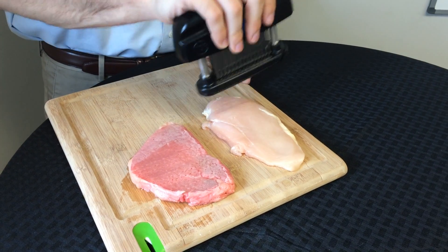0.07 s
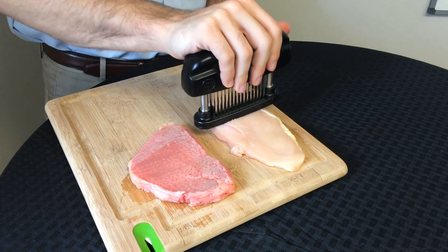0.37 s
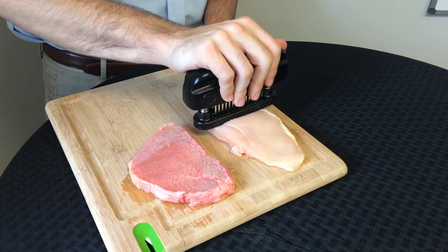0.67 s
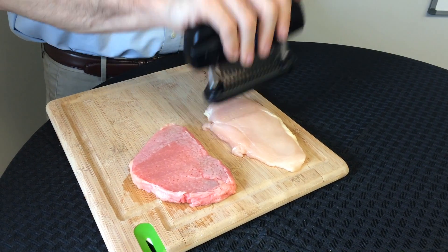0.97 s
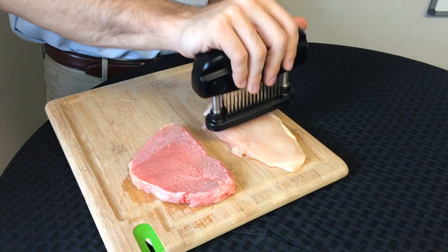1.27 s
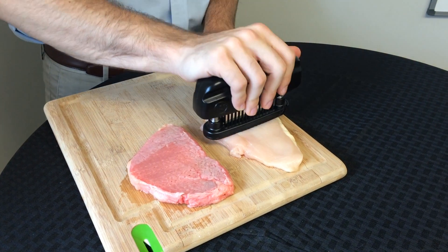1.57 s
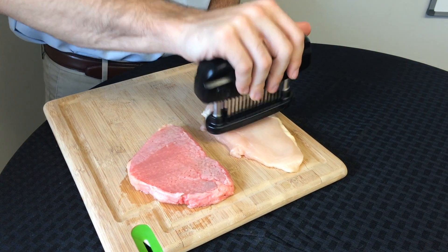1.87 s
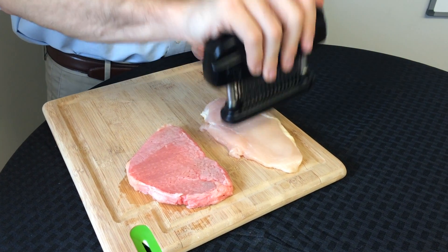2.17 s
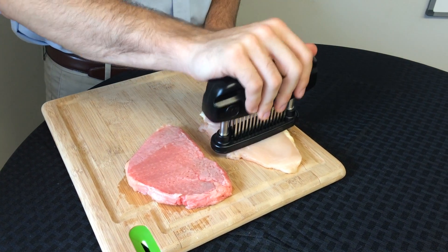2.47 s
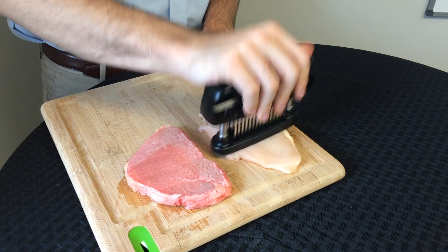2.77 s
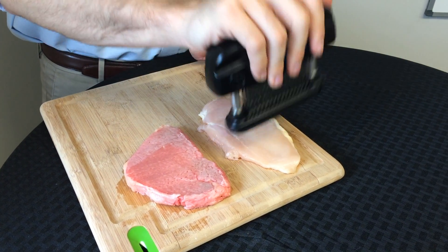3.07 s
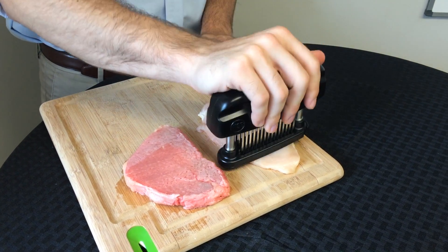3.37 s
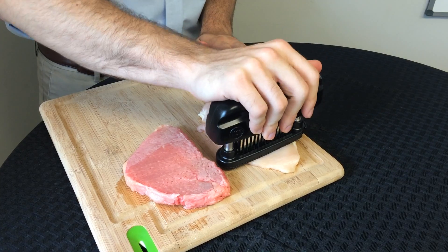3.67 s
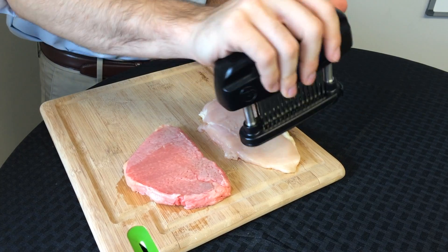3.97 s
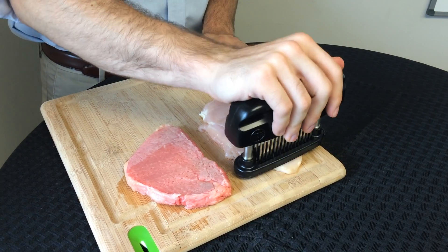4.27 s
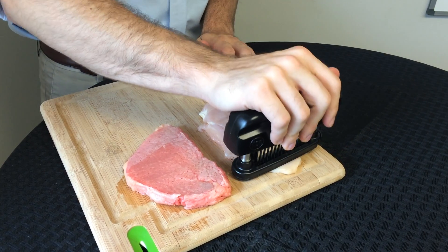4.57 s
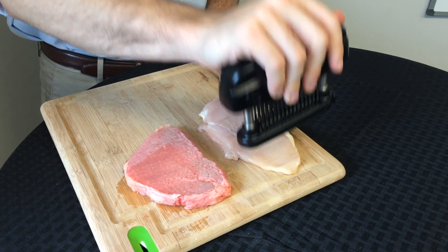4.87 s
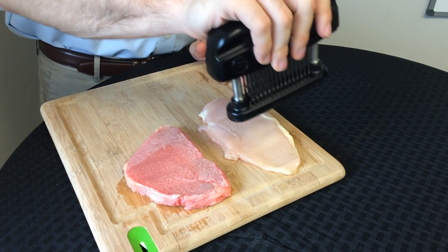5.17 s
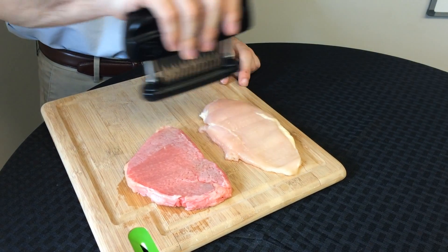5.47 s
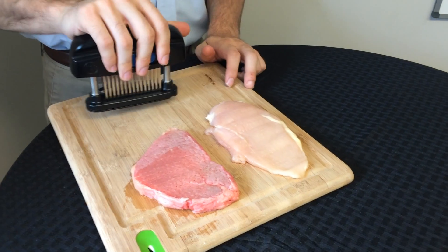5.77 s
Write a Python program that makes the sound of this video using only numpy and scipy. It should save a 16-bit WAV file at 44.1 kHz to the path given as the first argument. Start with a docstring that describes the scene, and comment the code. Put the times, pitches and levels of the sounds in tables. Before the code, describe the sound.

Sharp plastic snaps repeat five times in a steady rhythm as a meat tenderizer works raw chicken, close to the microphone. Before each snap come quieter sounds: the guard taps the meat, steel blades scrape in their slots and knock dully on a wooden board. After each snap the blades rattle briefly and the springs ring faintly. A low appliance hum fills the quiet kitchen.

```python
"""Blade tenderizer on a wooden board

A spring-loaded tenderizer is pressed five times into raw chicken, in a kitchen with a low hum.
Impact makes its plastic guard click; friction makes the blades scrape and squeak in their slots before
they knock on the board. On release the meat squelches and the guard slides back and snaps against its
stop. The snap sets blades and springs in free vibration: a short shimmer and a long, singing tone."""
import sys
import numpy as np
from scipy import signal
from scipy.fft import rfft, irfft, next_fast_len
from scipy.io import wavfile
from scipy.ndimage import map_coordinates

SR = 44100
rng = np.random.default_rng(int(sys.argv[2]) if len(sys.argv) > 2 else 0)


def put_to_file(sound):
    """Save the sound as 16-bit audio at rate SR, in the file named by the first command-line argument."""
    columns = np.atleast_2d(sound).T  # one column per channel
    safe = np.clip(columns, -1, 1)
    whole_steps = np.round(safe * 32767)
    wavfile.write(sys.argv[1], SR, whole_steps.astype(np.int16))


N = 256471

# Upstrokes; the first ends before time zero. Each row: hand eases off and guard hits its stop in seconds,
# snap level and body in dB, lead of the first corner in seconds, blade ring and squelch levels in dB.
UPSTROKES = [(-.12, -0.044, -18.5, -8.5, .001, -33, -56), (0.814, 0.8983, -14.5, -4, .0018, -29, -59.5),
             (1.836, 1.9125, -14, -5, 0.0014, -28, -45.5), (2.813, 2.882, -12.5, -4, 0.0025, -29, -50),
             (3.7808, 3.84, -15.5, -7.5, .0012, -30, -44), (4.746, 4.7971, -11.5, 2.5, 0.00089, -34.5, -47)]
# Downstrokes. Each row: slide starts and tips reach the board in seconds, slack click and scrape levels
# in dB, sag of the scrape as the meat slows the blades in dB per second, squeak and knock levels in dB.
DOWNSTROKES = [(0.551, 0.6139, -60, -40, 10, -34, -32.5), (1.596, 1.6614, -48.5, -38.5, 80, -37.5, -26.5),
               (2.595, 2.639, -49, -38.5, 38, -44, -33.5),
               (3.5514, 3.603, -44.5, -38.5, 219.5, -38.5, -32.5),
               (4.5195, 4.5373, -48, -36, 260, -37, -30.5)]
# The guard taps the meat or shifts on its posts.
# Each row: start in seconds, level in dB, body in dB, brightness (a brief, harsh high hiss) in dB.
GUARD_TAPS = [(0.4057, -34.5, -7, -16), (.423, -43.5, 3.5, -16), (1.4783, -30, 0, -11),
              (2.4312, -32, -9, -11), (2.4431, -39, -0.5, -8), (3.4204, -25, -8, -4),
              (4.3636, -31, -11, -13.5), (5.3287, -63, 2, -20)]
# A blade catches in its slot. Each row: start in seconds, level in dB.
BLADE_CATCHES = [(0.5552, -33), (0.5861, -32), (1.6253, -36.5), (2.6291, -38), (3.597, -38.5), (4.535, -35)]

# Modes of the plastic guard and housing. Each row: frequency in Hz, bandwidth in Hz, peak level in dB.
HOUSING_MODES = [(394, 28, -9), (612, 60, -13.5), (815, 99, -4.5), (956, 32, -6.5), (1178, 100, 0.5),
                 (1640, 38, -4), (2030, 160, -10), (2565, 97, -4.5), (3326, 100, 2), (3630, 450, 3),
                 (4135, 130, 1), (5550, 220, -5), (6480, 420, -4.5), (7350, 220, 0), (8445, 540, -2),
                 (9050, 310, -4), (11110, 400, -11)]
# Modes of the coil springs and the board. Each row: frequency in Hz, level in dB, T60 in seconds.
SPRING_MODES = [(795, -3, 8.5), (822, -5.5, 2.6), (835, 2, 4.6), (1707, -18, 4), (1760, -17, 6),
                (4942, -16, 1.7), (4877, -15.5, 1.3)]
BOARD_MODES = [(390, -12, .06), (450, -17, .04), (660, -7, .05), (790, -7, .035), (1020, -8, .03),
               (1300, -11, .025)]
# Squeaking blade modes and appliance hum. Each row: frequency in Hz, level in dB.
SQUEAK_TONES = [(5740, 1.5), (4140, -1.5)]
HUM_TONES = [(52.1, -47), (112.6, -46.5), (225, -60)]

# Noise spectra. Each row: frequency in Hz, relative spectral density in dB.
CRACK_SPECTRUM = [(180, -54.5), (300, -23.5), (1200, -8), (1490, -8), (2880, -9), (3690, -4), (4880, -6.5),
                  (5480, -8), (9140, -10.5), (12900, -17.5), (15500, -31)]
BRIGHT_SPECTRUM = [(4000, -30), (8000, -11), (10800, 1), (12500, -1), (15500, -23.5)]
SHIMMER_SPECTRUM = [(300, -20), (600, -2.5), (850, -5.5), (1190, 4.5), (1450, -2.5), (1700, -2.5),
                    (2050, -12.5), (2480, -2), (3250, -2.5), (3750, -5.5), (5500, -9.5), (8500, -15.5),
                    (12000, -15.5), (15500, -26.5)]
DOWN_SCRAPE_SPECTRUM = [(240, -41), (400, -19), (873, 5.5), (1300, -8.5), (1790, -4), (2880, -7.5),
                        (4090, -2.5), (4920, -8.5), (5730, -9.5), (6480, -8.5), (8930, -1), (11900, -5),
                        (15500, -22)]
UP_SCRAPE_SPECTRUM = [(240, -43.5), (400, -16.5), (886, -7), (2120, -10.5), (2400, -3.5), (2920, -15),
                      (3570, -3), (6280, -13.5), (8030, -1.5), (11900, -5.5), (15500, -25.5)]
SQUASH_SPECTRUM = [(250, -22.5), (400, -4.5), (520, -11.5), (700, 0.5), (1200, -5.5), (2000, -15),
                   (8000, -38.5)]
RUMBLE_SPECTRUM = [(22, -21), (40, -4), (70, 1), (100, -7), (135, -1), (148, -6.5), (163, 2.5),
                   (205, -10.5), (245, -14.5), (283, -9.5), (315, -29), (450, -31), (700, -61.5)]
HISS_SPECTRUM = [(150, -29.5), (300, -14.5), (450, -9), (880, -17.5), (1840, -22.5), (3700, -24),
                 (7300, -25.5), (11000, -29), (15500, -43)]
# Decay of the blades and the kitchen. Each row: frequency in Hz, T60 in seconds.
BLADE_T60 = [(500, .3), (1200, 0.16), (3200, 0.39), (8000, .44), (14000, 0.19)]
KITCHEN_T60 = [(200, .25), (1000, .25), (4000, .19), (14000, .16)]

SPRING_DB = -45  # relative to the snap
THUMP_DB, JOLT_DB = 4.5, -8  # table and housing, relative to the knock
SLACK_LEAD_S, UNSTICK_S, OVERRUN_S = .024, .018, .0079
TICKS_PER_S, TICK_DB, SETTLE_DB_PER_S = 12, -55, 80.5
PING_HZ, KNOCK_HZ, THUMP_HZ, SQUELCH_HZ, TOP_HZ = 3580, 890, 80, 820, 15700


def amp(db):
    """Decibels as an amplitude ratio."""
    return 10 ** (np.asarray(db) / 20)


def unit_rms(x):
    """x scaled to rms 1."""
    return x / np.sqrt(np.mean(x ** 2) + 1e-20)


def blow(x):
    """A transient scaled to the energy of 4 ms at rms 1."""
    return x / np.sqrt(np.sum(x ** 2) / (.004 * SR) + 1e-20)


def along(points, hz):
    """Interpolation of (Hz, value) points on a logarithmic frequency axis."""
    freqs, values = np.transpose(points)
    return np.interp(np.log(hz + 1), np.log(freqs + 1), values)


def clock(seconds):
    """Sample times of a span."""
    return np.arange(round(seconds * SR)) / SR


def fade(t, t60):
    """Exponential decay of 60 dB in t60 seconds; 1 while t is negative."""
    return amp(-60 * np.maximum(t, 0) / np.maximum(t60, 1e-4))


def rise(t, tau):
    """Exponential onset with a time constant of tau seconds."""
    return 1 - np.exp(-t / tau)


def scatter(hz, share):
    """A frequency with Gaussian relative scatter."""
    return hz * (1 + share * rng.standard_normal())


def tone(hz, t):
    """A sinusoid of random phase."""
    return np.sin(2 * np.pi * (hz * t + rng.random()))


def wobble(rate):
    """A smooth random curve with rate knots a second."""
    knots = rng.standard_normal(int(N * rate / SR) + 4)
    return map_coordinates(knots, [np.arange(N) * rate / SR])


def coloured(x, spectrum):
    """x filtered by a spectrum, at rms 1."""
    gain = amp(along(spectrum, np.fft.rfftfreq(len(x), 1 / SR)))
    return unit_rms(irfft(rfft(x) * gain, len(x)))


def noise(spectrum, size):
    """Coloured noise of rms 1."""
    return coloured(rng.standard_normal(next_fast_len(size)), spectrum)[:size]


def damped(x, decay):
    """Frequency-dependent damping: each band of x decays at its own rate."""
    hz, t, bands = signal.stft(x, SR, nperseg=256)
    return signal.istft(bands * fade(t, along(decay, hz)[:, None]), SR, nperseg=256)[1]


def add(track, start, x):
    """Superpose x on the track from start seconds."""
    i = round(start * SR)
    x = x[max(-i, 0):max(N - i, 0)]
    track[max(i, 0):][:len(x)] += x


def with_body(x, body_db):
    """A square blow moves the whole housing and favours its low modes: a shelf below 1500 Hz."""
    lows = signal.lfilter(*signal.butter(1, 1500, fs=SR), x)
    return x + (amp(body_db) - 1) * lows


def clack(body_db, crack_db=1, crack_t60=.024, contact_s=.0005):
    """Impact excites damped modes of the plastic, and a broadband crack while the parts grind together."""
    t = clock(.1)
    ring = sum(amp(db) * width * tone(scatter(hz, .0066), t) * np.exp(-np.pi * width * t)
               for hz, width, db in HOUSING_MODES)
    crack = noise(CRACK_SPECTRUM, len(t)) * fade(t - contact_s, crack_t60)
    hit = blow(ring * rise(t, .0005)) + amp(crack_db) * blow(crack)
    return with_body(blow(hit * rise(t, .00024)), body_db)


def guard_snaps():
    """The springs' restoring force drives the guard to its stop: one corner, the whole, then chatter."""
    out, t = np.zeros(N), clock(.1)
    for _, snap, db, body_db, lead, _, _ in UPSTROKES:
        add(out, snap - lead, amp(db - 10) * clack(body_db + 3, crack_db=0, crack_t60=.014))
        add(out, snap, amp(db) * clack(body_db, crack_db=-2, crack_t60=.014, contact_s=.001))
        chatter = noise(CRACK_SPECTRUM, len(t)) * fade(t, .062) * rise(t, .0013)
        add(out, snap, amp(db - 9.5) * with_body(chatter, body_db))
    return out


def guard_clicks():
    """Light impacts excite the guard as it taps, catches, takes up slack, is jolted and settles."""
    out, t = np.zeros(N), clock(.1)
    for start, db, body_db, bright_db in GUARD_TAPS:
        # A light tap leaves the guard free to ring on its steel posts.
        ping = tone(scatter(PING_HZ, .025), t) * fade(t, .027) * rise(t, .0005)
        tap = clack(body_db) + amp(bright_db) * bright_hiss() + amp(-8.5) * blow(ping)
        add(out, start, amp(db) * tap)
    for start, db in BLADE_CATCHES:
        add(out, start, amp(db) * (clack(body_db=-6) + amp(-2) * bright_hiss()))
    for start, bottom, slack_db, *_, knock_db in DOWNSTROKES:
        add(out, start - SLACK_LEAD_S, amp(slack_db) * clack(body_db=15))
        add(out, bottom, amp(knock_db + JOLT_DB) * clack(body_db=6))
        for held in np.cumsum(rng.exponential(1 / TICKS_PER_S, size=3)):
            add(out, bottom + held, amp(TICK_DB - SETTLE_DB_PER_S * held) * clack(body_db=4))
    return out


def bright_hiss():
    """High-frequency energy is heard as brightness: a brief, harsh hiss that sharpens a click."""
    t = clock(.1)
    return blow(noise(BRIGHT_SPECTRUM, len(t)) * fade(t, .025))


def friction(spectrum, slips_per_s=2500, smooth_db=-2):
    """Sliding friction of steel on plastic: many tiny random slips over a smooth hiss."""
    slips = (rng.random(N) < slips_per_s / SR) * rng.standard_normal(N)
    return coloured(unit_rms(slips) + amp(smooth_db) * rng.standard_normal(N), spectrum)


def blade_scrapes():
    """Friction noise follows sliding speed: it sags going down and swells as the guard springs back."""
    t = np.arange(N) / SR
    down, up = np.zeros(N), np.zeros(N)
    for start, bottom, _, db, sag, _, _ in DOWNSTROKES:
        onset = fade(start - t, .07)
        sag_db = sag * np.clip(t - start, 0, bottom - start)
        down += amp(db - sag_db) * onset * fade(t - bottom, .026)
    for ease, snap, *_ in UPSTROKES:
        start, end = ease + UNSTICK_S, snap + OVERRUN_S
        speed = np.sin(np.pi / 2 * np.clip((t - start) / (end - start), 0, 1))
        up += amp(-31) * speed ** 2.7 * fade(t - end, .024)
    rubbing = down * friction(DOWN_SCRAPE_SPECTRUM) + up * friction(UP_SCRAPE_SPECTRUM)
    grip = amp(.71 * wobble(rate=180))
    return grip * rubbing


def blade_squeaks():
    """Stick-slip drives two blade modes at an unsteady pitch as each downstroke starts."""
    out, t = np.zeros(N), clock(.06)
    swell = t / .004 * np.exp(1 - t / .004)
    for start, *_, db, _ in DOWNSTROKES:
        for hz, mode_db in SQUEAK_TONES:
            pitch = hz * (1 + .022 * wobble(rate=1000)[:len(t)])
            phase = 2 * np.pi * np.cumsum(pitch) / SR
            add(out, start, amp(db + mode_db) * swell * np.sin(phase))
    return out


def blade_shimmer():
    """High modal density: shaken by the snap, the thin steel blades ring as a band of decaying noise."""
    out, t = np.zeros(N), clock(.81)
    for _, snap, _, body_db, _, ring_db, _ in UPSTROKES:
        ring = damped(noise(SHIMMER_SPECTRUM, len(t)), BLADE_T60)[:len(t)]
        rattle = amp(1.7 * wobble(rate=110)[:len(t)])  # loose blades touch their neighbours
        add(out, snap, amp(ring_db) * with_body(ring, body_db) * rattle * rise(t, .0018))
    return out


def board_knocks():
    """The blade tips excite modes of the wood, heavily damped by the meat; the table thumps below."""
    out, t = np.zeros(N), clock(.2)
    onset = rise(t, .0008)
    thump = np.sin(2 * np.pi * THUMP_HZ * t) * fade(t, .07) * rise(t, .004)
    for _, bottom, *_, db in DOWNSTROKES:
        modes = sum(amp(mode_db) * tone(scatter(hz, .013), t) * fade(t, t60)
                    for hz, mode_db, t60 in BOARD_MODES)
        knock = tone(scatter(KNOCK_HZ, .034), t) * fade(t, .022)  # pitch varies from spot to spot
        wood = blow((knock + modes) * onset)
        squash = noise(SQUASH_SPECTRUM, len(t)) * fade(t, .27) * onset
        add(out, bottom, amp(db) * (wood + amp(-22) * squash + amp(THUMP_DB) * thump))
    return out


def meat_squelches():
    """Cavity resonance: an air pocket under the guard pops in the wet meat as the hand eases off."""
    out, t = np.zeros(N), clock(.1)
    for ease, *_, db in UPSTROKES:
        hz = scatter(SQUELCH_HZ, .08)
        pocket = noise([(hz / 2, -18), (hz, 0), (hz * 2, -20), (hz * 10, -48)], len(t))
        add(out, ease, amp(db) * blow(pocket * fade(t, .045) * rise(t, .001)))
    return out


def springs():
    """Free vibration: both springs ring from each snap until the next press damps them."""
    out, t = np.zeros(N), clock(2)
    damping = [(bottom - .06, .25) for _, bottom, *_ in DOWNSTROKES]  # start and T60 in seconds
    damping.append((UPSTROKES[-1][1], 1.3))  # the last ring fades as the tool is lifted away
    for (_, snap, snap_db, *_), (stop, stop_t60) in zip(UPSTROKES, damping):
        unsteady = t + .00013 * wobble(rate=30)[:len(t)]  # loose on their posts, the coils waver in pitch
        ring = sum(amp(db) * tone(scatter(hz, .0017), unsteady) * fade(t, t60)
                   for hz, db, t60 in SPRING_MODES)
        add(out, snap, amp(snap_db + SPRING_DB) * ring * fade(snap + t - stop, stop_t60))
    return out * amp(1.8 * wobble(rate=16))  # the level swells and sinks as the hand moves


def reverberation(x):
    """The kitchen's diffuse field: convolution with noise that builds up quickly and decays."""
    tail = damped(rng.standard_normal(SR // 2), KITCHEN_T60)
    tail *= rise(np.arange(len(tail)) / SR, .005)
    return signal.fftconvolve(x, tail / np.linalg.norm(tail))[:N]


def background():
    """An appliance's line spectrum lies over the continuous spectra of ventilation rumble and hiss."""
    t = np.arange(N) / SR
    hum = sum(amp(db + .73 * wobble(rate=1.7)) * tone(hz, t) for hz, db in HUM_TONES)
    return hum + amp(-51) * noise(RUMBLE_SPECTRUM, N) + amp(-70.5) * noise(HISS_SPECTRUM, N)


def scene():
    """Superposition of the close, direct sound, its weak reverberation and the background, in mono."""
    tool = guard_snaps() + guard_clicks() + blade_scrapes() + blade_squeaks() + blade_shimmer()
    direct = tool + board_knocks() + meat_squelches() + springs()
    return (direct + amp(-15) * reverberation(direct) + background())[None]


def record(dry):
    """Soft saturation rounds the highest peaks; a steep low-pass filter limits the bandwidth."""
    rounded = dry / (1 + np.abs(dry / .68) ** 4) ** (1 / 4)
    size = next_fast_len(N + SR // 2)
    hz = np.fft.rfftfreq(size, 1 / SR)
    low_pass = 1 / np.sqrt(1 + (hz / TOP_HZ) ** 160)
    return irfft(rfft(rounded, size) * low_pass, size)[:, :N]


dry = scene()
out = record(dry)
put_to_file(out)
```